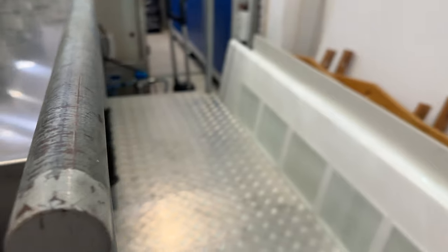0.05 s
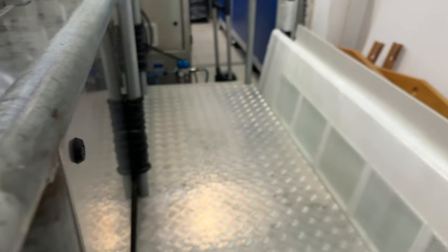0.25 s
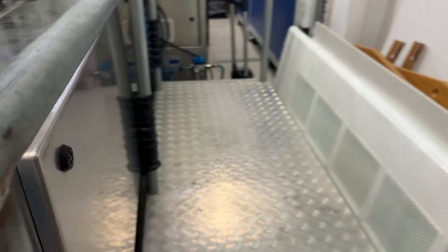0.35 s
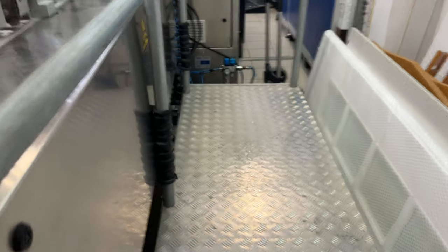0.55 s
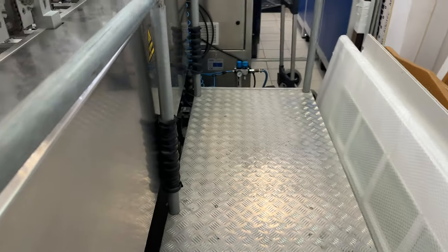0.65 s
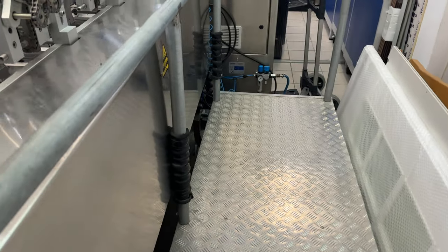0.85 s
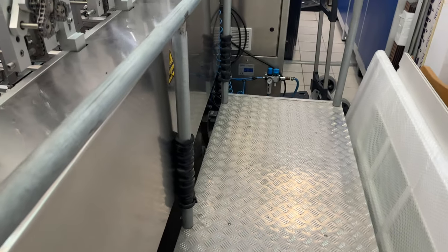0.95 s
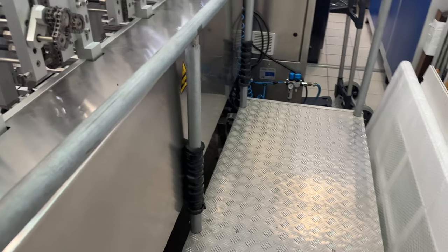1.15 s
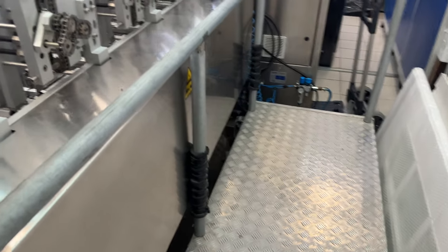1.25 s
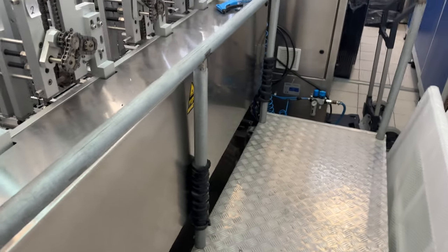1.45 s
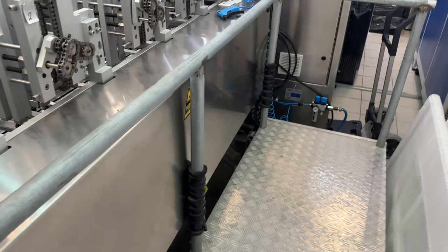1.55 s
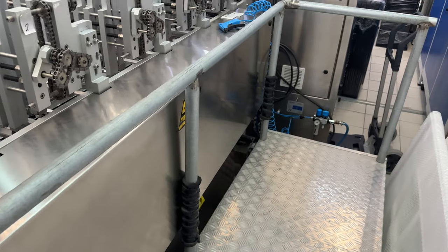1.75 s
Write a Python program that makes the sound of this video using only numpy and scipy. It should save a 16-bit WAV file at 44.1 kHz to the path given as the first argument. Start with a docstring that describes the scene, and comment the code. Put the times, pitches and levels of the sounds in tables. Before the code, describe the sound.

In a workshop, soft bumps on a hand-held microphone and rustling cloth lead into two slow steps on a ringing metal deck. A sole scuffs after the second, while a machine hisses faintly on the left.

```python
"""A workshop, on a tread-plate walkway beside a machine: two slow footsteps, heard from the walker's hand.
Each foot lands heel first and settles, so the metal deck rings dully and its frame booms.
Soles scuff, clothes rustle, the hand-held recorder bumps and clicks, and small pings run through metal.
Behind it all is the steady noise of the hall, where the machine hisses and faintly whistles."""
import sys
import numpy as np
from scipy import signal
from scipy.fft import rfft, irfft
from scipy.io import wavfile
from scipy.ndimage import uniform_filter1d

SR = 44100
rng = np.random.default_rng(int(sys.argv[2]) if len(sys.argv) > 2 else 0)


def int16_out(signal):
    """Quantize to a 16-bit WAV file."""
    q = np.round(np.clip(np.atleast_2d(signal).T, -1, 1) * 32767)
    wavfile.write(sys.argv[1], SR, q.astype(np.int16))


N = 79380
T = np.arange(N) / SR
HZ = np.fft.rfftfreq(N, 1 / SR)


def amp(db):
    """Turns decibels into a number to multiply by."""
    return 10 ** (np.asarray(db) / 20)


def unit(x):
    """Scales a sound to an average strength (rms) of 1."""
    return x / np.sqrt(np.mean(x ** 2) + 1e-20)


def at_pitch(table, hz):
    """Looks up a table by frequency, sliding between its rows."""
    freqs, values = np.transpose(table)
    return np.interp(np.log(hz + 1), np.log(freqs + 1), values)


def over_time(table, column=1):
    """Follows one column of a table through time."""
    columns = np.transpose(table)
    return np.interp(T, columns[0], columns[column])


def add(mix, start, sound):
    """Mixes a sound in at a start time in seconds."""
    part = mix[:, max(round(start * SR), 0):]
    part += sound[..., :part.shape[1]]


def pan(db):
    """Makes the left side db louder than the right."""
    return amp(np.array([[db / 2], [-db / 2]]))


def colour(x, db):
    """Turns each frequency up or down."""
    return irfft(rfft(x) * amp(db), N)


def noise(db, likeness=0.18):
    """Stereo noise with its tone shaped by db; likeness 1 means equal sides, -1 opposite sides."""
    mid, side = rfft(rng.standard_normal((2, N)))
    likeness = np.clip(likeness, -.99, .99)
    mid, side = mid * np.sqrt(1 + likeness), side * np.sqrt(1 - likeness)
    return unit(irfft(np.array([mid + side, mid - side]) * amp(db), N))


def die_away(x, ring_times):
    """Fades each frequency at its own speed. A ring time (t60) is how long a 60 dB fade takes."""
    hz, t, bands = signal.stft(x, SR, nperseg=512)
    t60 = np.maximum(at_pitch(ring_times, hz), .01)[:, None]
    return signal.istft(bands * amp(-60 * t / t60), SR, nperseg=512)[1][:, :N]


def swell(start, rise, fade):
    """A level that rises smoothly, then fades."""
    return np.sin(np.pi / 2 * np.clip((T - start) / rise, 0, 1)) * np.exp(
        -np.maximum(T - start - rise, 0) / fade)


def bending_wave(time, tone_db, spread, hz, right_lag):
    """A pulse through metal, highs first: pitch hz arrives at time, and 1 kHz travels for spread seconds."""
    delay = time - spread * np.sqrt(1000 / hz) + np.array([[0], [right_lag]])
    turns = 2 * spread * np.sqrt(1000 * HZ) + HZ * delay
    wave = irfft(amp(tone_db) * np.exp(-2j * np.pi * turns), N)
    return wave / abs(wave).max()


# The workshop's echo. Each row: frequency in Hz, ring time in seconds.
ECHO_TIMES = [(100, 1), (1000, 0.42), (4000, 0.55), (12000, 0.33)]


def echo(x):
    """The workshop throws a sound back as a smooth, fading tail."""
    tail = die_away(noise(0 * HZ), ECHO_TIMES) * np.minimum(T / 0.00068, 1)
    return signal.fftconvolve(x, tail / np.linalg.norm(tail[0]), axes=1)[:, :N]


# The tone of the hall's noise. Each row: frequency in Hz, relative level in dB.
HALL_TONE = [(20, -38), (35, -5), (60, -3), (82, 2.5), (105, -10.5), (156, 0), (210, -6), (340, -2),
             (480, -10.5), (600, -12), (750, -8.5), (1100, -9), (1700, -10), (2130, -12.5), (2700, -15.5),
             (5000, -24), (8000, -28.5), (10500, -27), (15500, -38.5)]
# How loud the hall is. Each row: time in seconds, level in dB.
HALL_LOUDNESS = [(0, -59), (0.65, -57), (0.88, -56.5), (0.97, -61), (1.12, -57.5), (1.55, -58.5),
                 (1.8, -58)]
# How alike its two sides are. Each row: frequency in Hz, likeness.
HALL_LIKENESS = [(50, 0.86), (300, 0.72), (900, 0.12), (3000, 0.025), (12000, 0.45)]
# Where the machine's hiss sits. Each row: time in seconds, left over right in dB.
HISS_PAN = [(0, 20), (0.85, 8), (1.2, 15), (1.8, 10.5)]
# The machine's air whistle. Each row: time in seconds, pitch in Hz, level in dB.
AIR_WHISTLE = [(1.0, 5400, -80), (1.08, 6000, -75), (1.2, 6900, -70), (1.28, 6200, -75.5),
               (1.42, 6000, -82)]


def hall_and_machine(whistle_width_hz=320):
    """Steady workshop noise; the machine on the left hisses and whistles faintly."""
    air = noise(at_pitch(HALL_TONE, HZ), at_pitch(HALL_LIKENESS, HZ)) * amp(over_time(HALL_LOUDNESS))
    hiss = colour(air, -10 * np.log10(1 + (np.log2((HZ + 1) / 5500) / 0.36) ** 6))  # around 5500 Hz
    left_db = over_time(HISS_PAN) / 2
    shift_left = hiss * (amp(np.array([left_db, -left_db])) - 1)
    flutter = noise(-10 * np.log10(1 + (2 * HZ / whistle_width_hz) ** 4))
    glide = np.sin(2 * np.pi * np.cumsum(over_time(AIR_WHISTLE)) / SR)
    whistle = flutter * glide * amp(over_time(AIR_WHISTLE, column=2))
    return air + shift_left + whistle * pan(db=12)


# Swishes of cloth. Each row: start in seconds, level in dB, rise and fade in seconds.
CLOTH_SWISHES = [(-0.05, -50.5, 0.055, 0.35), (0.28, -43, 0.0066, .025), (0.73, -57, 0.11, 0.2)]
# Their tone. Each row: frequency in Hz, relative level in dB.
CLOTH_TONE = [(500, -12), (1500, 8), (3000, 2.5), (4500, -1), (6500, -0.5), (10000, 1), (12500, -6.5),
              (15500, -6)]


def clothes():
    """Cloth rubs in smooth swells of noise."""
    return sum(amp(db) * swell(start, rise, fade) * noise(at_pitch(CLOTH_TONE, HZ), likeness=0.26)
               for start, db, rise, fade in CLOTH_SWISHES)


# Bumps of the hand. Each row: start in seconds, level in dB, rough length in seconds.
HAND_BUMPS = [(-0.005, -38.5, 0.041), (0.041, -31.5, 0.026), (0.134, -38.5, 0.022), (0.193, -45.5, 0.015)]
# Their tone. Each row: frequency in Hz, relative level in dB.
BUMP_TONE = [(25, -15), (50, 0), (85, 7.5), (150, -5), (240, -9), (450, -13), (700, -28), (3000, -66)]


def hand_bumps():
    """Soft bumps of the hand push the microphone's two openings in opposite ways."""
    out = np.zeros((2, N))
    for start, db, length in HAND_BUMPS:
        thud = noise(at_pitch(BUMP_TONE, HZ), likeness=-0.76)
        out += amp(db) * swell(start, length / 2, length * 0.81) * thud * pan(db=5.5)
    return out


# Clinks. Each row: start in seconds, level in dB, pitch in Hz, ring time in seconds, left over right in dB.
METAL_CLINKS = [(0.0168, -32, 7000, 0.006, 13), (0.4357, -41.5, 5130, 0.0083, 12),
                (0.4705, -35, 6010, 0.0057, 9.5)]


def clinks(rise_s=0.00027):
    """Small metal parts touch and ring at one pitch for an instant."""
    out = np.zeros((2, N))
    for start, db, hz, t60, pan_db in METAL_CLINKS:
        level = amp(db - 60 * T / t60) * np.minimum(T / rise_s, 1)
        add(out, start, level * np.sin(2 * np.pi * hz * T) * pan(pan_db))
    return out + amp(-10) * echo(out)


# Small ticks. Each row: time in seconds, level in dB, low and high edge in Hz, spread in seconds,
# left over right in dB, delay of the right side in seconds, echo in dB.
SMALL_TICKS = [(0.152, -43.5, 1480, 3600, 0.0022, -12, .0002, -6), (0.173, -44, 1094, 1880, .003, 4, 0, 2),
               (0.4702, -35.5, 5700, 13600, 0.0041, -8, -.0002, -3),
               (0.471, -43, 2100, 3830, 0.0028, -10, 0, 1),
               (0.4755, -40, 3600, 8960, 0.0047, 6, -.0005, -3.5),
               (0.481, -41.5, 895, 2050, 0.00384, -13, -.0005, 4.5),
               (0.578, -48.5, 6760, 16000, 0.0065, 2, 0, 0.5), (0.69, -46.5, 2900, 9500, 0.0008, 7, 0, -16),
               (0.8214, -35.5, 580, 2150, 0.00302, -2, 0, -3), (1.111, -46.5, 507, 1121, 0.0025, 0, 0, -24),
               (1.6007, -44.5, 531, 8770, 0.0022, 25, .0002, -7.5),
               (1.5997, -41, 6650, 8800, 0.0019, 17, 0, -13)]


def ticks(tilt_db_per_octave=-5):
    """Handling clicks of the hand-held recorder, and pings that chirp down through the plate or rail."""
    direct, to_echo = np.zeros((2, 2, N))
    for time, db, low_hz, high_hz, spread, pan_db, lag, echo_db in SMALL_TICKS:
        band_db = -10 * np.log10((1 + (low_hz / (HZ + 1)) ** 12) * (1 + (HZ / high_hz) ** 20))
        tilt_db = tilt_db_per_octave * np.log2(np.maximum(HZ / low_hz, 1))
        tick = amp(db) * bending_wave(time, band_db + tilt_db, spread, np.sqrt(low_hz * high_hz), lag)
        direct += tick * pan(pan_db)
        to_echo += tick * amp(echo_db)
    return direct + echo(to_echo)


# Scuffs. Each row: start in seconds, level in dB, rise and fade in seconds, treble change in dB.
SOLE_SCUFFS = [(0.543, -58.5, 0.019, 0.023, 10), (1.272, -46, 0.05, 0.073, -18),
               (1.352, -55.5, 0.024, 0.023, 1.5), (1.459, -54.5, 0.0062, 0.036, 4.5)]
# The tone of the rubbing. Each row: frequency in Hz, relative level in dB.
SCUFF_TONE = [(200, -3), (600, -4), (1000, -2.5), (1500, -6), (2300, -9), (3200, -10.5), (6000, -15),
              (10000, -25.5), (15000, -45)]
# Notes the plate sings under a scuff. Each row: pitch in Hz, width in Hz, strength in dB.
SCUFF_NOTES = [(589.5, 18, 15), (1250, 18, 4), (1394, 11, 17.5), (1547, 23, 12.5), (1708, 21, 15.5),
               (1820, 90, 2.5), (1974, 32, 12), (2294, 14.5, 15.5), (3950, 44, 5.5), (4260, 47, 4)]


def scuffs(grain_db=0.5):
    """Soles rub with a slightly grainy noise and leave the plate singing faintly."""
    out = np.zeros((2, N))
    plate = 1 + sum(amp(db) / (1 + 2j * (HZ - hz) / width) for hz, width, db in SCUFF_NOTES)
    for start, db, rise, fade, treble_db in SOLE_SCUFFS:
        jitter = unit(uniform_filter1d(rng.standard_normal(N), 130))
        level = amp(db) * swell(start, rise, fade) * unit(amp(grain_db * jitter))
        rub = level * noise(at_pitch(SCUFF_TONE, HZ), likeness=0.25)
        singing = irfft(rfft(rub) * plate, N)
        out += colour(singing, treble_db * HZ ** 2 / (HZ ** 2 + 2500 ** 2))
    return out


# Booms. Each row: start in seconds, level in dB, pitch in Hz, rise and ring time in seconds,
# left over right in dB.
FRAME_BOOMS = [(0.25, -39, 56, 0.0091, 0.78, -6.5), (0.267, -41.5, 73.8, 0.0085, 0.58, 5),
               (1.156, -55, 64, 0.027, 1, -7.5), (1.231, -39.5, 79.5, 0.031, 0.75, -1),
               (1.4, -40, 80.2, 0.015, 0.36, -1), (1.54, -50, 60.6, 0.023, 0.2, -0.5),
               (1.629, -54.5, 63.2, 0.0072, 0.89, -7)]


def frame_booms():
    """The walkway's frame flexes under the walker's weight and gives low notes."""
    out = np.zeros((2, N))
    for start, db, hz, rise, t60, pan_db in FRAME_BOOMS:
        level = amp(db - 60 * np.maximum(T - rise, 0) / t60) * np.minimum(T / rise, 1)
        add(out, start, level * np.sin(2 * np.pi * hz * T) * pan(pan_db))
    return out


def sole_tone(hz, bass_db, treble_db):
    """Change in dB below about 177 Hz and above about 890 Hz: softer soles give more bass, less treble."""
    return bass_db / (1 + (hz / 177) ** 4) + treble_db * (1 - 1 / (1 + (hz / 890) ** 4))


# The deck's own notes. Each row: pitch in Hz, relative level in dB when struck on the near panel,
# the same for the far panel, ring time in seconds.
DECK_NOTES = [(123.4, -21, -10.5, 0.81), (160, -8.5, -10.5, 0.62), (235.5, -29, -7.5, 0.59),
              (268, -20, -17, 0.89), (302, -20, -4, 0.44), (315.7, -1.5, -16, 0.78), (342.3, 1, 3, 0.34),
              (392.3, 3.5, -15, 0.32), (430.5, -22, -9.5, 0.33), (490.3, 0, -19, 0.44),
              (514, -13, -7, 0.27), (628, -13.5, -31.5, 0.59), (643, -31, -16, 0.17),
              (706.4, -14.5, -14.5, 0.4), (755, -29, -9, 0.19), (1149, -19, -10.5, 0.23),
              (1278, -12, -23, 0.28), (1335, -14, -30, 0.5), (1363, -20, -32, 0.63), (1628, -13, -32, 0.19)]


def deck_notes(place, bass_db, treble_db, rise_s=0.00044):
    """The struck deck rings; where the foot stands decides how strong each note is."""
    notes = np.zeros(N)
    for k, (hz, near_db, far_db, t60) in enumerate(DECK_NOTES):
        db = np.interp(place, [0, 1], [near_db, far_db]) + sole_tone(hz, bass_db, treble_db)
        notes += (-1) ** k * amp(db - 60 * T / t60) * np.sin(2 * np.pi * hz * T)
    return notes * (1 - np.exp(-T / rise_s))


# The plate's wash of many close notes. Each row: frequency in Hz, relative level in dB.
WASH_TONE = [(50, -39), (130, -12.5), (205, -8.5), (320, 0.5), (500, -1), (600, -8), (950, -14),
             (1350, -15), (1800, -19), (2400, -27.5), (4000, -38), (15000, -54.5)]
# How long the wash lasts. Each row: frequency in Hz, ring time in seconds.
WASH_TIMES = [(100, 0.91), (300, 0.75), (600, 0.54), (1400, 0.47), (4000, 0.58), (12000, 0.63)]
# How alike its two sides are. Each row: frequency in Hz, likeness.
WASH_LIKENESS = [(150, 0.97), (500, 0.31), (1500, 0.1)]
# The knock of the sole's first touch. Each row: frequency in Hz, relative level in dB.
KNOCK_TONE = [(80, -54), (250, 3), (420, 27), (700, 12), (1400, 15.5), (1900, 12), (2500, -23), (4000, -40),
              (15000, -62)]
# The blows that make up the two steps. Each row: start in seconds, level in dB, bass and treble change
# in dB, pitch factor for knock and wash, knock change in dB, deck note change in dB,
# place from 0 (near panel) to 1 (far panel).
FOOT_BLOWS = [(0.2373, -31, -20, 3.5, 0.96, 4.5, 6, 0.53), (0.2566, -31, -11, 8.5, 0.96, 8.5, 2, 0.051),
              (0.262, -32.5, 10.5, -24, 1.01, 9.5, 5.5, 0.13),
              (0.423, -39.5, 18.5, -12.5, 0.99, 5, -1, 0.1), (1.149, -33.5, 2.5, 1.5, 0.87, 2, 1, 0.86),
              (1.258, -46, 2, 3, 0.93, 0.5, -2, 1), (1.269, -47, 6.5, -20, 0.6, 11, 5, 1),
              (1.679, -51, 10, -24, 0.71, -8, 8, 0.77), (1.717, -59.5, -2, -5, 0.7, -2, 15, 1),
              (1.756, -52.5, 9, 8, 0.97, 2, -2, 1)]


def footsteps(knock_t60=0.046):
    """Each blow of a foot sends a pulse through the plate, knocks, and leaves the deck ringing."""
    out = np.zeros((2, N))
    for start, db, bass_db, treble_db, pitch, knock_db, notes_db, place in FOOT_BLOWS:
        sole_db = sole_tone(HZ, bass_db, treble_db)
        knock_tone = at_pitch(KNOCK_TONE, HZ / pitch)
        pulse = bending_wave(start, knock_tone + sole_db, spread=0.002037, hz=1470, right_lag=0)
        out += amp(db + knock_db + 0.5) * pulse
        notes = deck_notes(place, bass_db, treble_db)
        wash = noise(at_pitch(WASH_TONE, HZ / pitch), at_pitch(WASH_LIKENESS, HZ))
        wash = die_away(colour(wash, sole_db), WASH_TIMES)
        knock = colour(noise(knock_tone, likeness=0.35), sole_db) * amp(-60 * T / knock_t60)
        blow = amp(notes_db - 7) * notes + amp(-4) * wash + amp(knock_db - 6.5) * knock
        add(out, start, amp(db) * blow * np.minimum(T / 0.00022, 1))
    return out


def scene():
    """All the sounds together."""
    walking = footsteps() + frame_booms() + hand_bumps() + ticks() + clinks() + scuffs() + clothes()
    return walking + hall_and_machine()


def record(dry):
    """The microphone dips a narrow band at 7540 Hz and cuts below 36 Hz and above 15900 Hz."""
    dip_db = -29 * np.exp(-((HZ - 7540) / 144) ** 2)
    low_cut = signal.butter(4, 36, "high", fs=SR, output="sos")
    high_cut = signal.firwin(511, 15900, window=("kaiser", 9), fs=SR)
    heard = signal.sosfilt(low_cut, colour(dry, dip_db))
    return signal.oaconvolve(heard, high_cut[None], "same")


dry = scene()
out = record(dry)
int16_out(out)
```